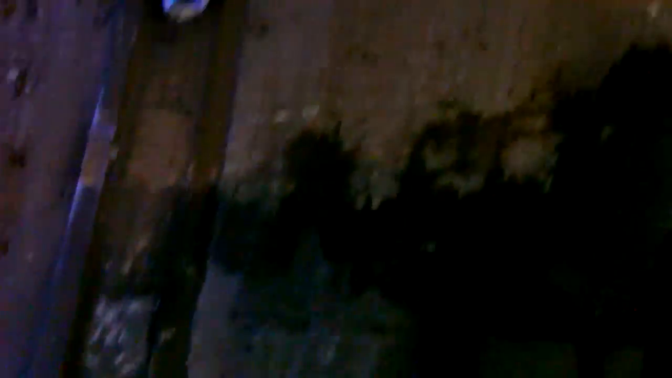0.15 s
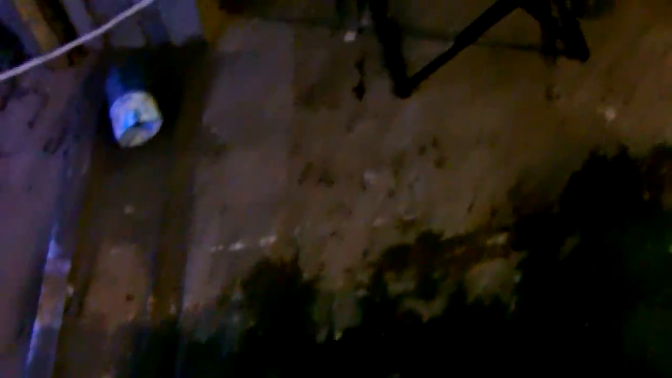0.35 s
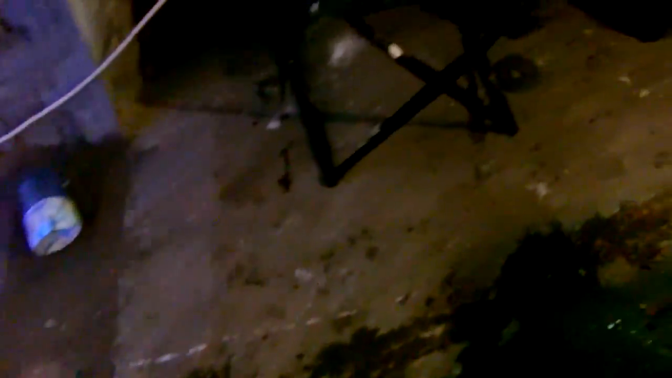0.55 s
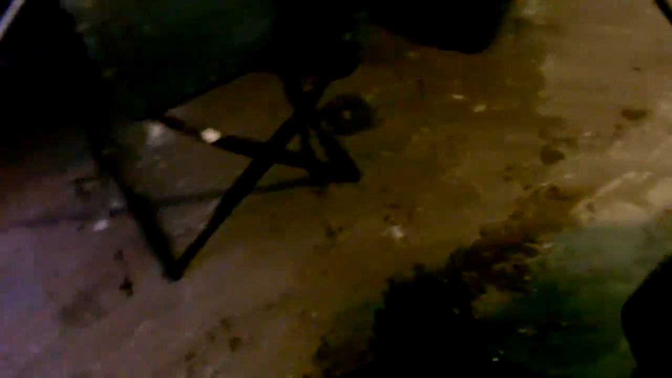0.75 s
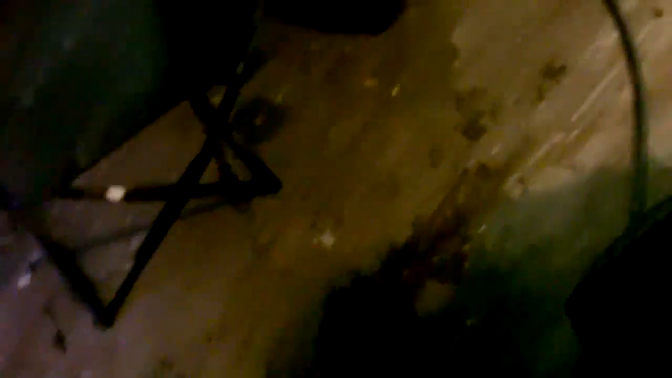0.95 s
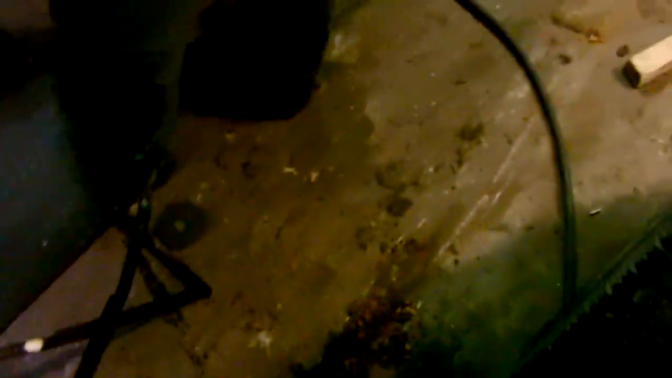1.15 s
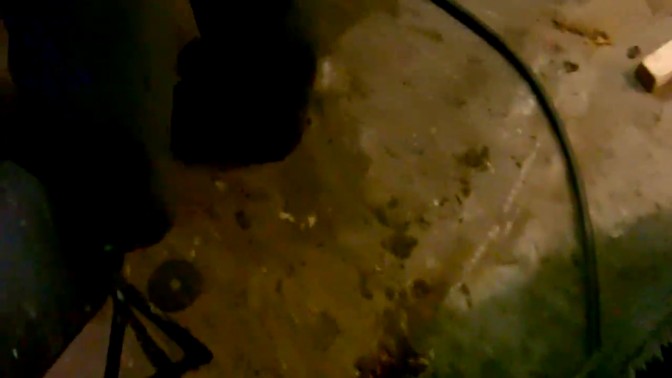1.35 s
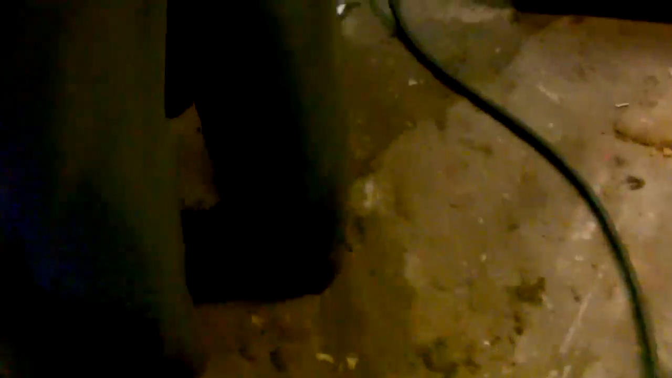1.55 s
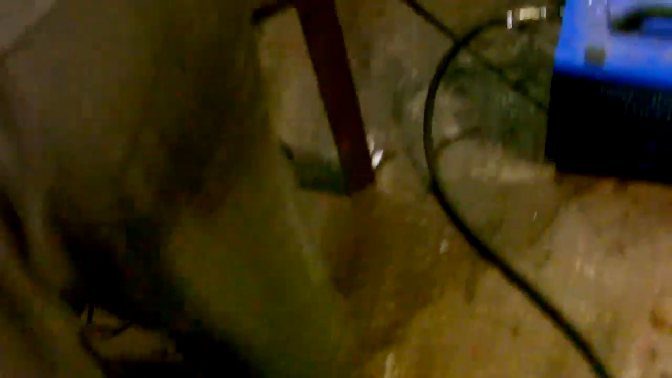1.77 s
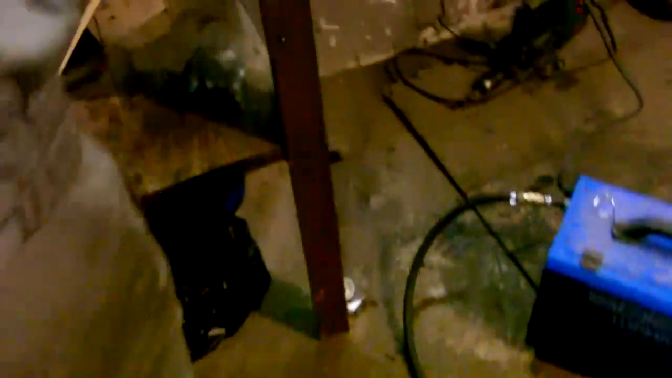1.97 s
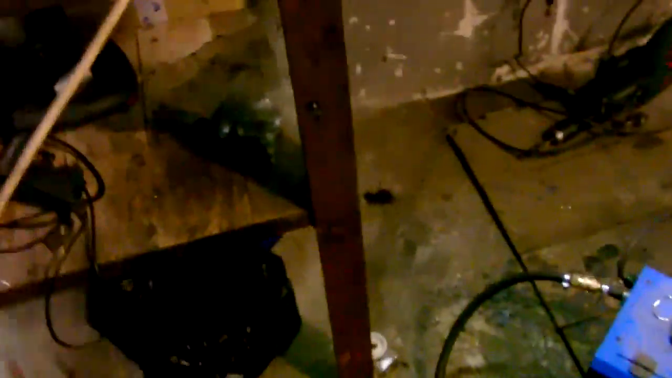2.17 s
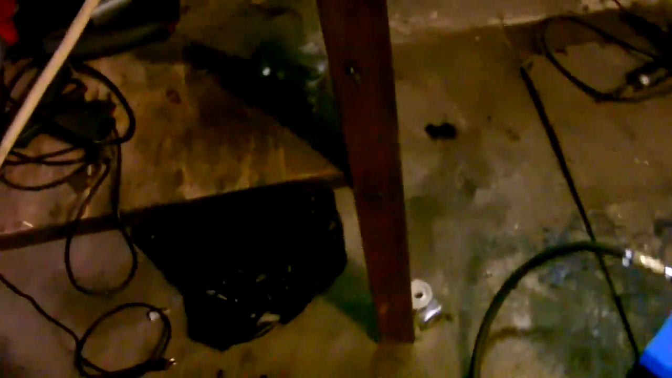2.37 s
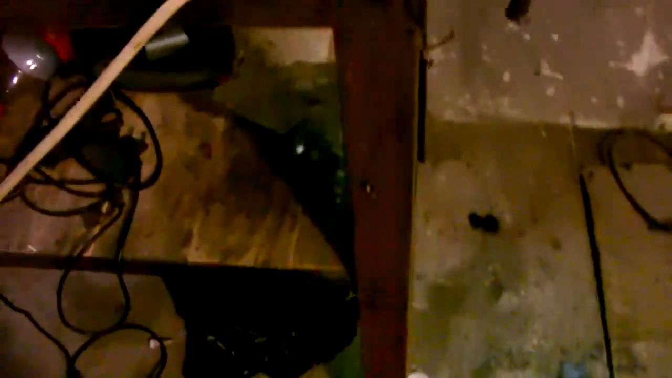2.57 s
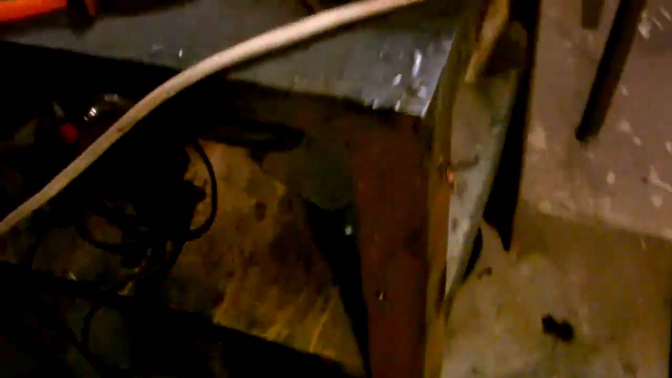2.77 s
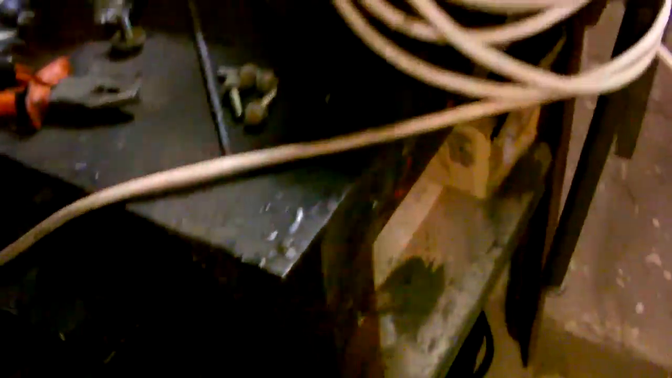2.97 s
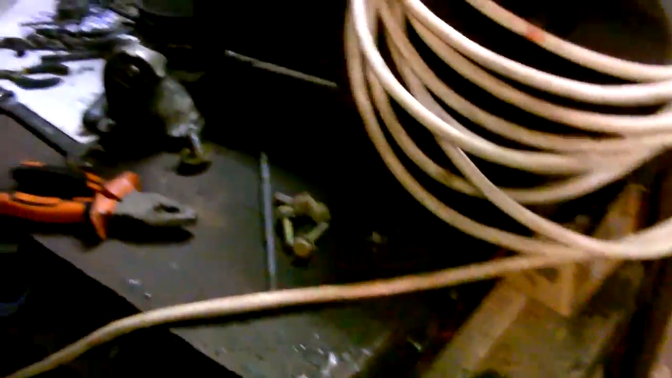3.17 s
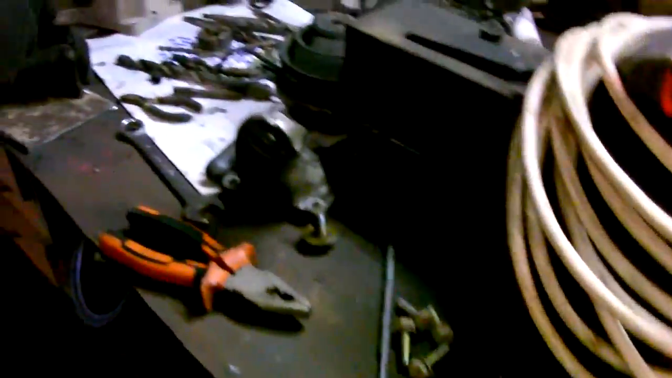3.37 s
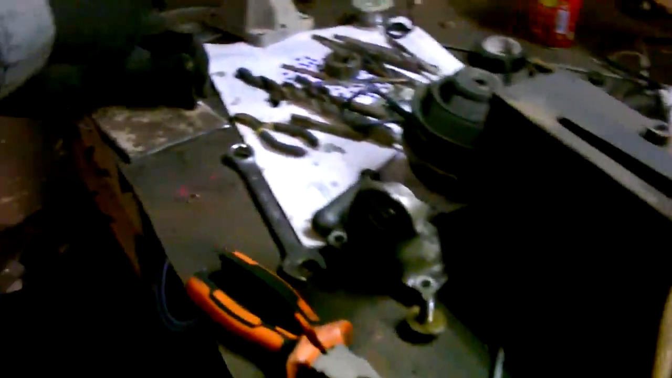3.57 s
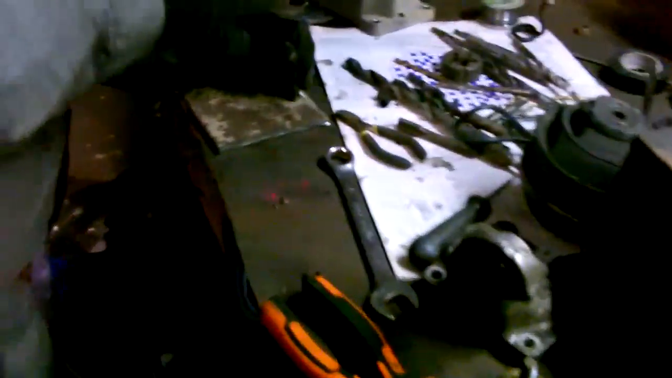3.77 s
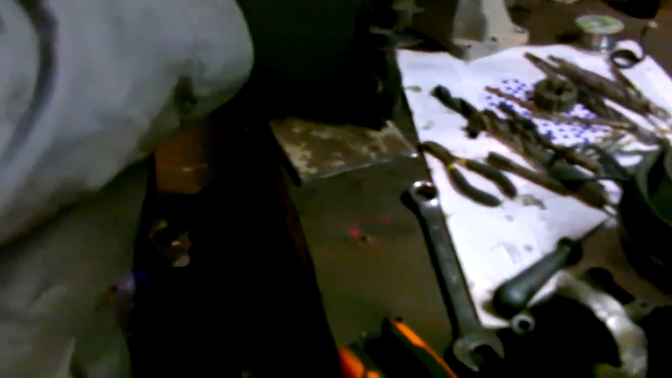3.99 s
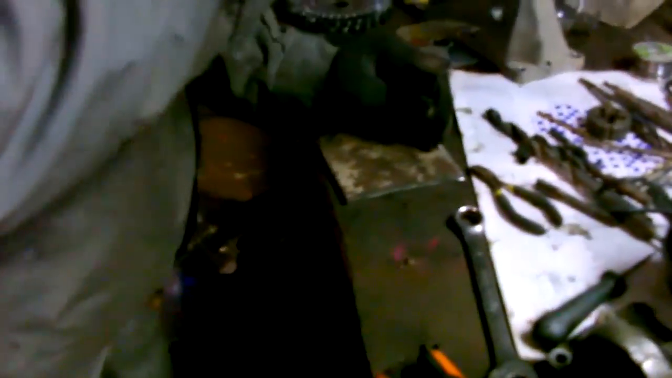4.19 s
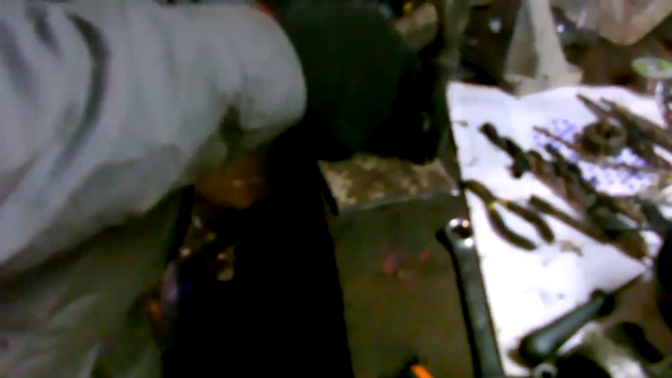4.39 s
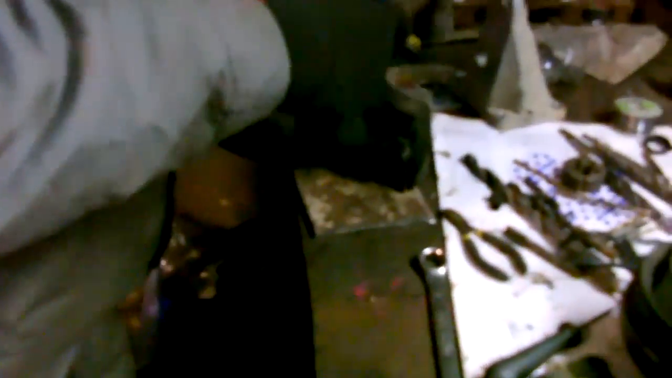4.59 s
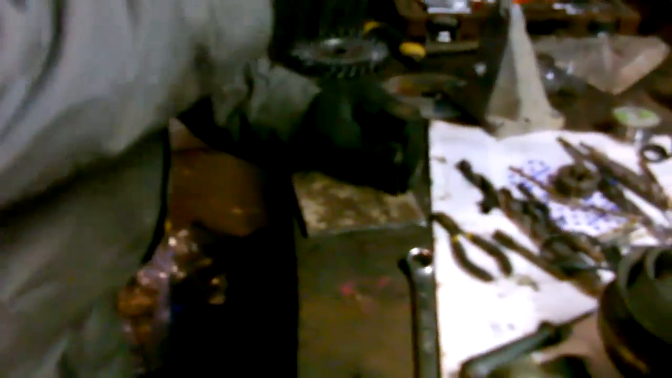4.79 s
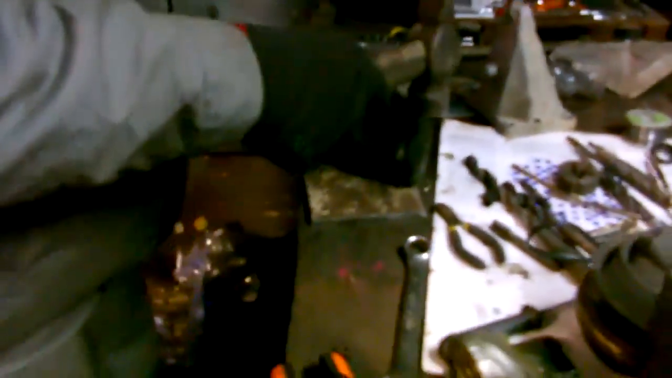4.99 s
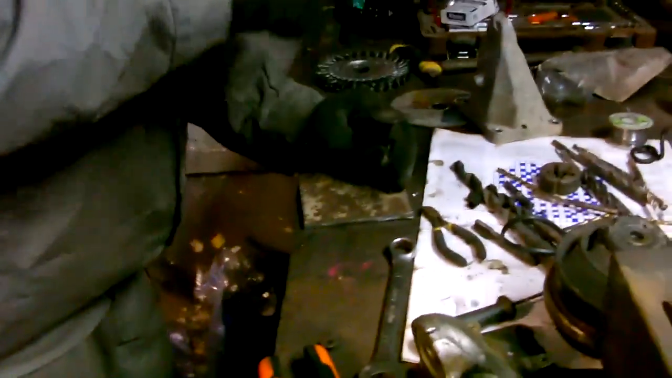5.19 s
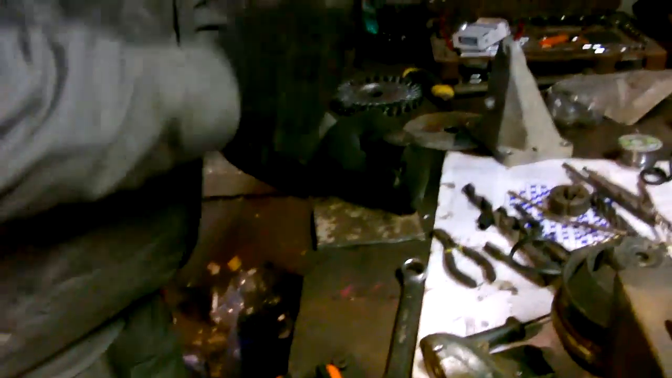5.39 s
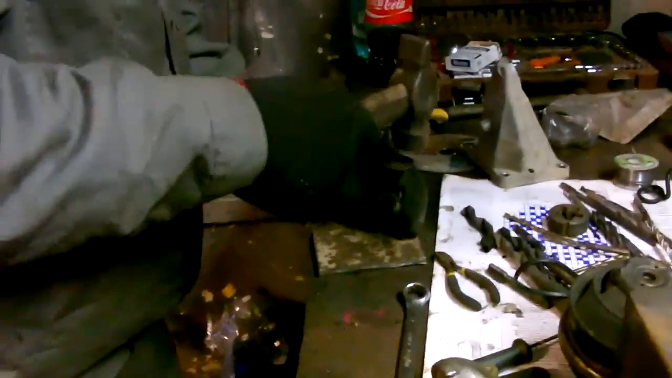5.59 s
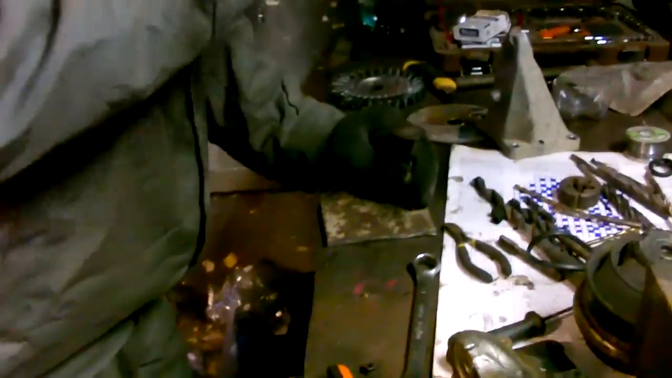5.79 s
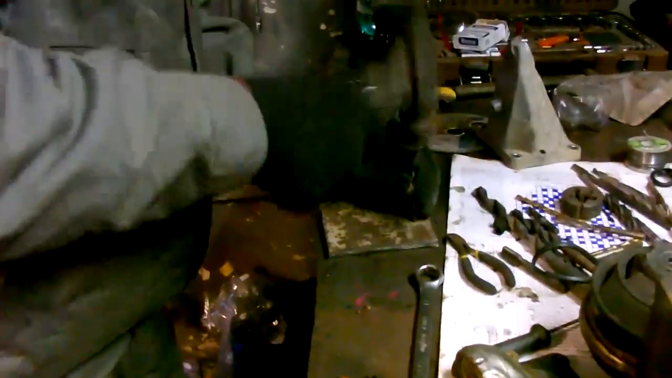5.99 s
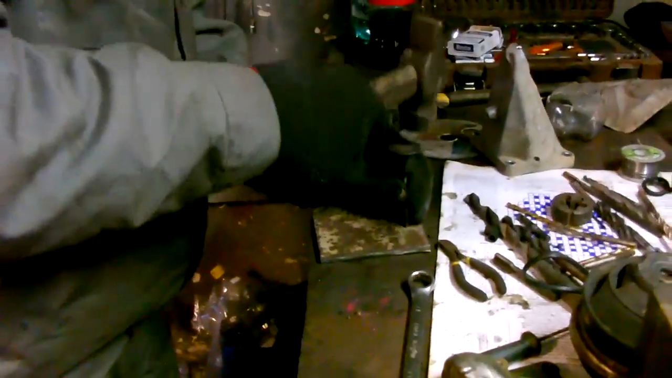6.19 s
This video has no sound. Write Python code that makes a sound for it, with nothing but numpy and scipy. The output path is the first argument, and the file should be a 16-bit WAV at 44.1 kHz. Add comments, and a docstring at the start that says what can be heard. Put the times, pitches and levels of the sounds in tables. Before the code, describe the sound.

In a garage, someone walks with a handheld microphone: work clothes rustle, soles scuff, grit ticks, and a few dull footfalls land. A sharp knock comes just before the walker stops. Then a hammer strikes a steel plate on a metal bench five times, about twice a second, each blow a harsh clipped crash with rattling tools and ringing steel. Steady hiss lies underneath.

```python
"""In a garage, someone walks about in rustling work clothes, camera in hand, grit ticking under the shoes.
Then a hammer hits a steel plate on a metal workbench five times: the bench crashes, tools chatter, steel rings.
Rubbing and crashes are shaped noise, footfalls and ticks are short noise bursts, ringing is fading sines.
A steady hiss lies beneath. The blows overload the microphone, and its gain control steps down with each one."""
import sys
import numpy as np
from scipy import signal
from scipy.fft import rfft, irfft
from scipy.io import wavfile
from scipy.ndimage import uniform_filter1d

SR = 44100
rng = np.random.default_rng(int(sys.argv[2]) if len(sys.argv) > 2 else 0)


def waveform_to_disk(signal):
    """Save audio, clipped to [-1, 1], as 16-bit WAV at the path in sys.argv[1]."""
    frames = np.transpose(np.atleast_2d(signal))
    scaled = np.clip(frames, -1, 1) * 32767
    samples = np.round(scaled).astype(np.int16)
    wavfile.write(sys.argv[1], SR, samples)


N = 275625

# The hammer blows. Each row: start in seconds, force in dB, treble tilt in dB per octave,
# tool chatter in dB, steel ring in dB, then extra dB for each of the first five steel tones,
# which depends on where the hammer lands.
BLOW_TABLE = [(3.8937, 5, -1.95, -11.5, -32.5, -14, 3, -22, 25.2, -13.5),
              (4.4054, 4.96, -0.13, -3.5, -45.5, 0.5, 3.5, 6, 25.7, 17.5),
              (4.9462, 2.8, 0.56, -22.5, -42, 3, -17.5, -19, 17.4, -2),
              (5.5028, 5.6, 0.85, -13, -36.5, -10.5, -24.5, -8.5, 11, -7.5),
              (6.0751, 9.6, 1, -23.5, -48, -5, -5, -16, 13, -2)]
# How alike the left and right microphones hear. Each row: pitch in Hz, left-right correlation from 0 to 1.
LEFT_RIGHT_LIKENESS = [(60, 0.45), (200, 1), (600, 0.97), (1300, 0.94), (2400, 0.85), (4400, 0.39),
                       (8000, 0.13), (15000, 0.15)]
EDGE_HZ = 15800  # nothing much is heard above this


def amp(db):
    """Turns decibels into a plain multiplier."""
    return 10 ** (np.asarray(db) / 20)


def unit(x):
    """Scales to an rms (average strength) of 1."""
    return x / np.sqrt(np.mean(x ** 2) + 1e-20)


def read(points, hz):
    """Reads between the rows of a table, with pitch on a logarithmic axis."""
    f, value = np.transpose(points)
    return np.interp(np.log(hz + 1), np.log(f + 1), value)


def flat(hz):
    """The spectrum of plain white noise: 0 dB at every pitch."""
    return 0 * hz


def fade(t, t60):
    """A natural decay, which drops by 60 dB in t60 seconds."""
    return np.exp(-np.log(1000) * t / t60)


def add(mix, s, sound):
    """Mixes a stereo sound in at s seconds."""
    part = mix[:, round(s * SR):][:, :sound.shape[1]]
    part += sound[:, :part.shape[1]]


def noise(size, colour):
    """Stereo noise with the dB spectrum colour(hz); the two microphones agree most in the low mids."""
    hz = np.fft.rfftfreq(size, 1 / SR)
    mid, side = rfft(rng.standard_normal((2, size)))
    same = read(LEFT_RIGHT_LIKENESS, hz)
    # shared noise goes equally to both sides, the rest with opposite signs
    mid = mid * np.sqrt(1 + same)
    side = side * np.sqrt(1 - same)
    spectrum = np.array([mid + side, mid - side]) * amp(colour(hz))
    return unit(irfft(spectrum, size))


def die_away(x):
    """Lets each band of pitch decay at the pace of the bench and garage."""
    # Each row: pitch in Hz, time to fall by 60 dB in seconds.
    decay_times = [(100, 0.33), (400, 0.46), (900, 0.37), (2000, 0.3), (5000, 0.27), (9000, .29),
                   (15000, 0.19)]
    hz, t, z = signal.stft(x, SR, nperseg=256)
    z = z * fade(t, read(decay_times, hz)[:, None])
    return signal.istft(z, SR, nperseg=256)[1][:, :x.shape[1]]


def hiss(level_db=-51):
    """The steady background: noise of a fixed colour that never changes in level."""
    # Each row: pitch in Hz, strength in dB per Hz.
    hiss_colour = [(30, -18.5), (120, -19), (300, -5.5), (650, 2), (1700, -4.5), (4500, -8.5), (8000, -10),
                   (13000, -4.5), (15200, -12.5), (16000, -37)]
    return amp(level_db) * noise(N, lambda hz: read(hiss_colour, hz))


def stride(t, rise_s=0.077, fall_s=0.19):
    """The effort of one stride around its peak at t = 0: a quick swell, a slower release."""
    return np.exp(np.minimum(t / rise_s, -t / fall_s))


def friction(spectrum, grain_db, grain_hz):
    """Rubbing: noise of rms 1 that comes in uneven little catches, grain_hz random levels a second."""
    catches = np.interp(np.arange(N) / SR * grain_hz, np.arange(N), rng.standard_normal(N))
    rub = noise(N, flat) * amp(grain_db * catches)
    colour = amp(read(spectrum, np.fft.rfftfreq(N, 1 / SR)))
    return unit(irfft(rfft(rub) * colour, N))


def crunch(grains_per_s=63, grain_s=.002, low_hz=900, high_hz=3600):
    """Fine grit crushed under the soles: brief noise grains at random moments, of rms 1."""
    chance, size = rng.random((2, N))
    hits = size * (chance < grains_per_s / SR)
    # every hit fades away over a few milliseconds
    grains = signal.lfilter([1], [1, -np.exp(-1 / (grain_s * SR))], hits)
    band = signal.butter(2, [low_hz, high_hz], "band", fs=SR, output="sos")
    return unit(signal.sosfilt(band, grains * noise(N, flat)))


def tap(db, low_hz, high_hz, t60, room_db):
    """A short dead impact: a noise burst in one band, followed by the garage's echo."""
    size = SR // 2
    t = np.arange(size) / SR
    band = signal.butter(4, [low_hz, min(high_hz, EDGE_HZ)], "band", fs=SR, output="sos")
    burst = signal.sosfilt(band, noise(size, flat) * fade(t, t60))
    # make up for what a narrow band takes away
    burst = amp(db) * burst * np.sqrt(SR / 2 / (high_hz - low_hz))
    room = die_away(noise(size, flat))
    echo = signal.fftconvolve(burst[:1], room / np.linalg.norm(room[0]), axes=1)[:, :size]
    return burst + amp(room_db) * echo


def impacts():
    """Feet land and things bump with a dull echo; ticks are close, brief and nearly dry."""
    # Footfalls and bumps. Each row: start in seconds, level in dB, lowest Hz, highest Hz,
    # time to fall by 60 dB in seconds.
    footfalls = [(.733, -49.5, 121, 300, 0.072), (1.475, -26, 270, 1310, 0.12),
                 (1.591, -17.5, 288, 2000, .1), (1.612, -22.5, 500, 950, .15), (1.97, -39.5, 240, 980, 0.7),
                 (2.156, -25.5, 497, 14800, .11), (2.228, -44, 100, 700, 0.11),
                 (4.834, -47.5, 106, 600, .2), (4.881, -39, 302, 2600, 0.2), (5.923, -41, 303, 2170, 0.13),
                 (5.998, -37.5, 486, 2070, .13)]
    # Grit underfoot and the hand on the camera. Each row: start in seconds, level in dB, lowest Hz, highest Hz.
    sharp_ticks = [(.07, -30.5, 900, 3500), (.088, -28, 900, 3200), (.309, -27, 700, 3020),
                   (.3158, -23.5, 4000, 16000), (0.3721, -22.5, 3500, 8400), (.407, -27, 1100, 2870),
                   (0.6103, -21.5, 1890, 16000), (0.705, -26.5, 1860, 5900), (0.772, -28, 1200, 13000),
                   (0.8237, -15, 1590, 6860), (2.491, -26, 300, 9100), (2.715, -30.5, 1500, 12400),
                   (2.765, -31.5, 1000, 9000), (2.811, -22.5, 270, 980), (2.878, -18, 790, 3330),
                   (2.913, -6, 836, 2470), (3.018, -20, 715, 2960), (3.574, -31, 202, 1000),
                   (3.611, -28.5, 400, 3060), (3.686, -27, 1755, 3700), (4.631, -38, 4560, 11400)]
    out = np.zeros((2, N))
    for s, db, low_hz, high_hz, t60 in footfalls:
        add(out, s, tap(db, low_hz, high_hz, t60, room_db=-0.5))
    for s, db, low_hz, high_hz in sharp_ticks:
        add(out, s, tap(db, low_hz, high_hz, t60=0.01, room_db=-8.5))
    return out


def walker(settle_s=0.29, sway_cloth_db=-47.5, sway_soles_db=-52.5, crunch_level_db=-6):
    """Each stride rubs cloth and scuffs soles; the rustle between strides dies down after the first blow."""
    # Strides and shuffling steps. Each row: peak in seconds, swish of cloth in dB, scuff of soles in dB.
    steps = [(.03, -44.5, -48.5), (.25, -49, -48), (.68, -46, -45), (.84, -37, -44.5), (1.64, -37.5, -36),
             (2.199, -34, -35), (2.882, -33, -35.5), (3.22, -41.5, -44), (3.4, -41.5, -43.5),
             (3.88, -39, -44)]
    # Brisk swishes of a sleeve. Each row: peak in seconds, level in dB, half length in seconds.
    sleeve_swishes = [(0.781, -34, 0.014), (0.975, -37, .014), (1.522, -31, 0.043), (2.034, -32.5, 0.066),
                      (2.315, -25.5, 0.016), (2.987, -29, 0.03), (3.386, -29, 0.046), (5.94, -44, 0.012)]
    # The colour of rubbing cloth. Each row: pitch in Hz, strength in dB per Hz.
    cloth_colour = [(100, -44.5), (500, -14.5), (2000, 1.5), (4000, -2), (7000, -1.5), (12500, 0.5),
                    (15000, -2), (16000, -32.5)]
    # The colour of scuffing soles. Each row: pitch in Hz, strength in dB per Hz.
    sole_colour = [(40, -42.5), (120, -23), (280, -8), (600, 0), (1600, -0.5), (2600, -5), (4000, -12.5),
                   (9000, -24)]
    t = np.arange(N) / SR
    moving = np.exp(-(np.maximum(t - BLOW_TABLE[0][0], 0) / settle_s) ** 2)
    swish = amp(sway_cloth_db) * moving
    scuff = amp(sway_soles_db) * moving
    # overlapping movements add up by their power
    for s, cloth_db, soles_db in steps:
        swish = np.hypot(swish, amp(cloth_db) * stride(t - s))
        scuff = np.hypot(scuff, amp(soles_db) * stride(t - s))
    for s, db, half_s in sleeve_swishes:
        swish = np.hypot(swish, amp(db) * np.exp(-((t - s) / half_s) ** 2))
    cloth = swish * friction(cloth_colour, grain_db=2.5, grain_hz=1074)
    grit = amp(crunch_level_db) * crunch()
    soles = scuff * (friction(sole_colour, grain_db=3.5, grain_hz=161.0) + grit)
    return cloth + soles + impacts()


def bench_db(hz):
    """The spectrum of the struck bench: its strongest resonances rise out of a dense crash."""
    # The crash of bench and garage. Each row: pitch in Hz, strength in dB per Hz.
    crash_colour = [(30, -43), (100, -25), (180, -22), (400, -12), (800, -4), (1500, 0), (2500, -1.5),
                    (3500, -10.5), (5500, -7.5), (8000, -13.5), (13000, -9.5), (16000, -22.5)]
    # Resonances of the bench top. Each row: pitch in Hz, width in Hz, level in dB against the crash.
    bench_tones = [(212, 30, 2), (293, 39, 6), (435, 40, 5.5), (594.5, 15, 8), (664, 18, 2.5),
                   (768, 19, -0.5), (840, 18, 8), (890, 14, 5.5), (944, 54, 4.5), (1247, 16, 4.5),
                   (1337, 51, -1.5), (1515, 43, -3), (1460, 22, 4.5), (1870, 20, -0.5), (2036, 24, 4.5),
                   (2670, 84, -1), (6510, 15, 9.5)]
    centre, width, db = np.transpose(bench_tones)[:, :, None]
    peaks = amp(db) ** 2 / (1 + (2 * (hz - centre) / width) ** 2)
    return read(crash_colour, hz) + 10 * np.log10(1 + peaks.sum(0))


def chatter(t, per_s=260, settle_s=0.068):
    """Loose tools jump and land on the bench: a short shower of small impacts, of energy 1."""
    chance, size = rng.random(len(t)), rng.standard_normal(len(t))
    strength = np.sign(size) * (1 + abs(size))
    taps = (chance < per_s / SR) * strength * np.exp(-(t / settle_s) ** 2)
    return taps / (np.linalg.norm(taps) + 1e-9)


def ring(modes, t, extra_db=0):
    """Decaying sines, one per mode; their phase differs more where the microphones agree less."""
    hz, db, t60 = np.transpose(modes)[:, :, None]
    phase, spread = rng.uniform(-np.pi, np.pi, (2, len(modes), 1))
    apart = np.sign(spread) * np.arccos(read(LEFT_RIGHT_LIKENESS, hz)) / 2
    level = amp(db + extra_db) * fade(t, t60)
    angle = 2 * np.pi * hz * t + phase
    return np.array([(level * np.sin(angle + side * apart)).sum(0) for side in (-1, 1)])


def clinks(t, count=80, level_db=-28, spread_db=5, t60=0.32):
    """Many short high notes of spanners, pliers and drill bits; higher ones tend to die sooner."""
    place, size, length = rng.random((count, 3)).T
    hz = 2000 + 12000 * place
    db = level_db + spread_db * (2 * size - 1)
    decay = t60 * (.7 + .5 * length) * (4000 / hz) ** .3
    return ring(np.transpose([hz, db, decay]), t)


def waver(t, count, depth_db=2, rate_hz=3.5):
    """Each tone swells and fades (dB) as the hand-held microphone moves through its standing waves."""
    phase, pace = rng.random((2, count, 1))
    return depth_db * np.sin(2 * np.pi * (rate_hz * (.5 + pace) * t + phase))


def hammer(likeness=0.64, crash_db=1, crack_db=6, crack_s=0.0011, tools_tilt_db=0.5, spread_s=0.00096):
    """Each blow: a contact crack, the crash of the bench, chattering tools and the ring of the steel."""
    # The ringing steel plate. Each row: pitch in Hz, level in dB, time to fall by 60 dB in seconds.
    steel_tones = [(1670, -3.5, 6.7), (3386, -1.5, 2.8), (3962, 1, 0.97), (5720, -5, 0.87),
                   (8032, 3.5, 1.7), (950, 3.5, 1.1), (1491, -3, 1.1), (4250, -14, 1.2), (7467, -13, 1.9),
                   (10200, -14, 1.5), (11714, 0.5, 1.2)]
    out, t = np.zeros((2, N)), np.arange(SR) / SR
    bench = noise(SR, bench_db)
    next_blows = [row[0] for row in BLOW_TABLE[1:]] + [N / SR]
    # the treble tilt turns around 1500 Hz and stops growing below 200 Hz
    octaves = np.log2(np.maximum(np.fft.rfftfreq(SR, 1 / SR), 200) / 1500)
    for (s, force_db, tilt_db, chatter_db, ring_db, *spot_db), until in zip(BLOW_TABLE, next_blows):
        # the same bench answers every blow, a little differently at each spot
        body = likeness * bench + np.sqrt(1 - likeness ** 2) * noise(SR, bench_db)
        tilted = irfft(rfft(body) * amp(tilt_db * octaves), SR)
        crash = amp(crash_db) * die_away(tilted)
        crack = amp(crack_db) * noise(SR, flat) * np.exp(-t / crack_s)
        # every little landing of a tool sets off a short copy of the bench sound
        landing = die_away(noise(SR, lambda hz: bench_db(hz) + tools_tilt_db * octaves)) * np.exp(-t / 0.044)
        tools = amp(chatter_db) * signal.fftconvolve(landing, chatter(t)[None], axes=1)[:, :SR]
        # the shock takes a moment to cross the bench
        shaken = (crash + tools + clinks(t)) * (1 - np.exp(-t / spread_s))
        add(out, s, amp(force_db) * (crack + shaken))
        # the steel rings until the hammer lands on it again
        extra_db = np.pad(spot_db, (0, len(steel_tones) - len(spot_db)))[:, None]
        steel = ring(steel_tones, t, extra_db + waver(t, len(steel_tones)))
        add(out, s, amp(ring_db) * steel * (t < until - s))
    return out


def scene():
    """Walker and hammer over a steady hiss."""
    return hiss() + walker() + hammer()


def record(dry, threshold_db=-12, fall_db_per_s=27, recover_db_per_s=0.5, ceiling=0.98):
    """Gain control winds down while the sound is loud and creeps back; the converter clips; treble is cut off."""
    power = uniform_filter1d((dry ** 2).mean(0), size=400)
    power_db = 10 * np.log10(abs(power) + 1e-12)
    loud = .5 + .5 * np.tanh((power_db - threshold_db) / 2)  # 0 when quiet, 1 when loud
    wound = np.cumsum(fall_db_per_s * loud - recover_db_per_s) / SR
    cut_db = wound - np.minimum.accumulate(wound)  # the cut never goes below zero
    clipped = np.clip(dry * amp(-cut_db), -ceiling, ceiling)
    low_pass = signal.firwin(255, EDGE_HZ, window=("kaiser", 7), fs=SR)
    return signal.oaconvolve(clipped, low_pass[None], "same", axes=1)


dry = scene()
out = record(dry)
waveform_to_disk(out)
```